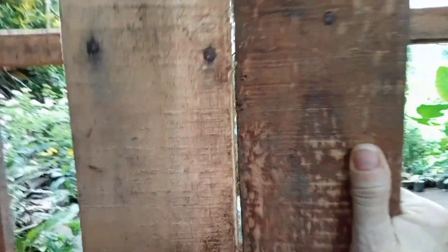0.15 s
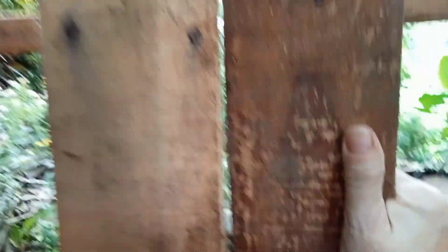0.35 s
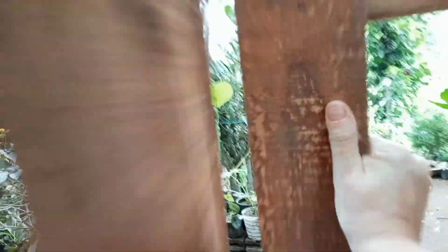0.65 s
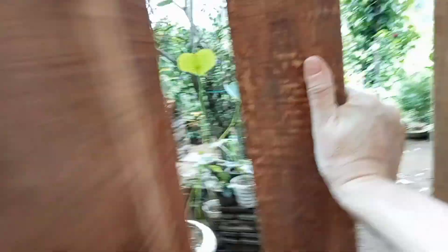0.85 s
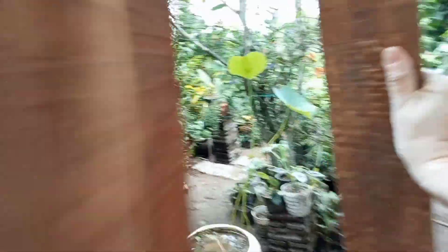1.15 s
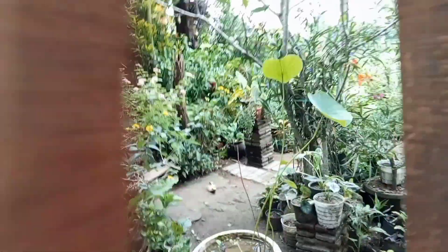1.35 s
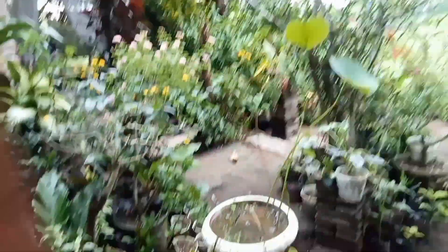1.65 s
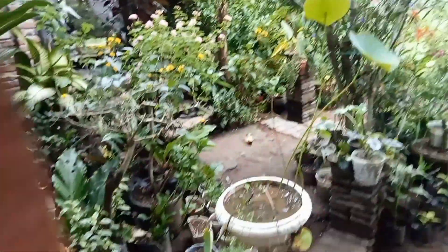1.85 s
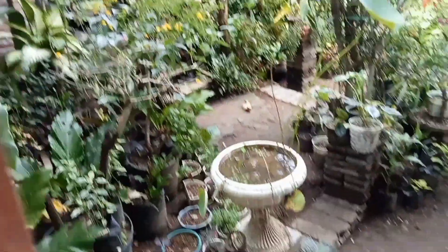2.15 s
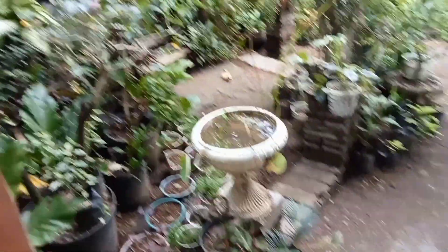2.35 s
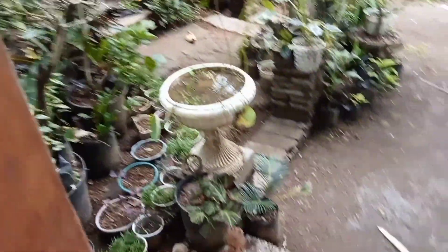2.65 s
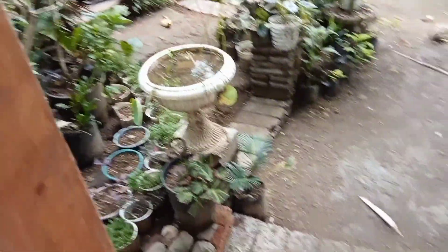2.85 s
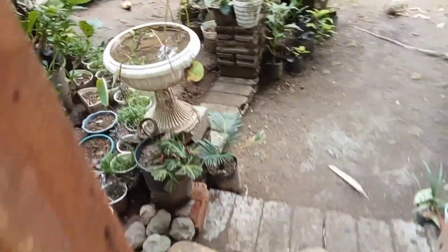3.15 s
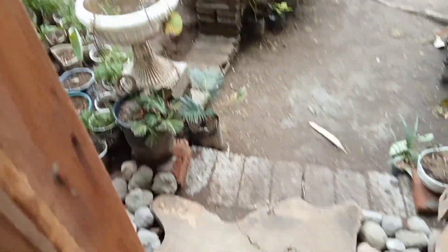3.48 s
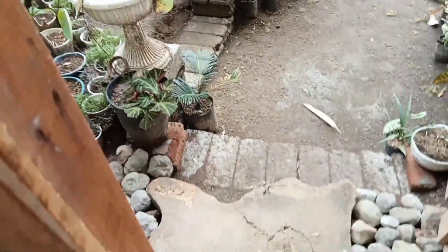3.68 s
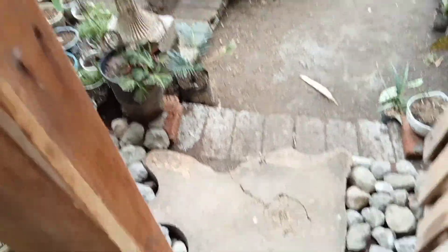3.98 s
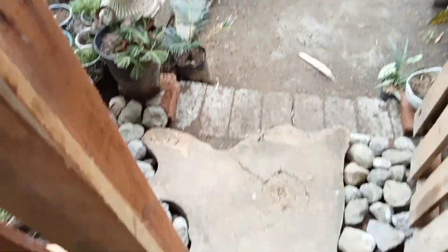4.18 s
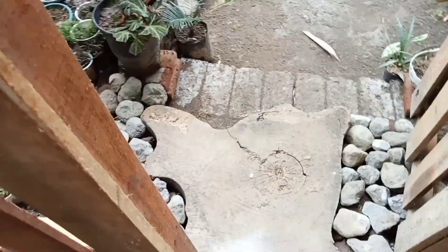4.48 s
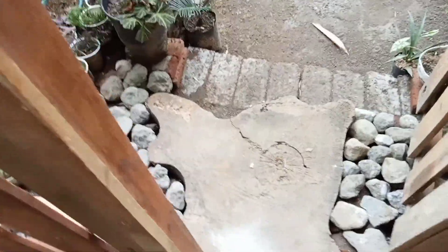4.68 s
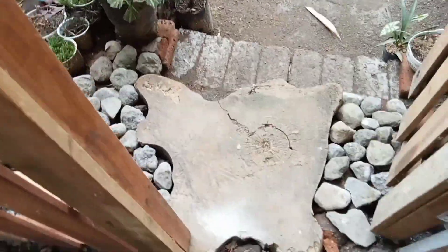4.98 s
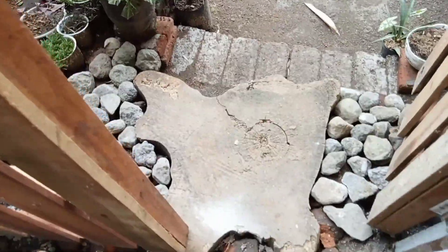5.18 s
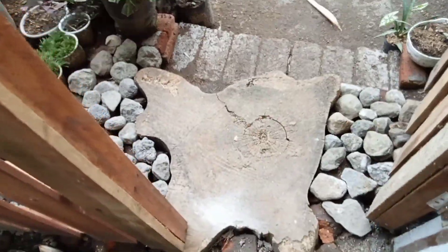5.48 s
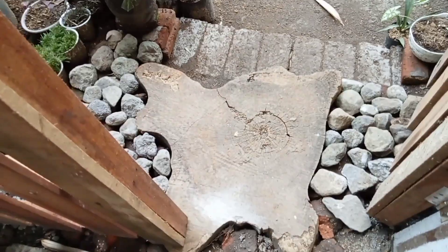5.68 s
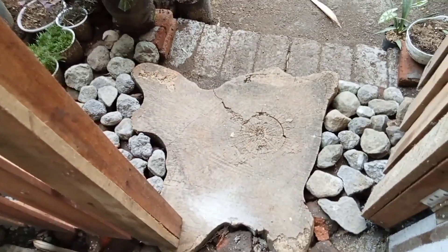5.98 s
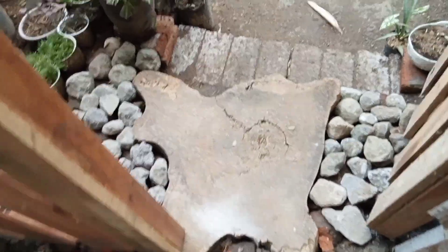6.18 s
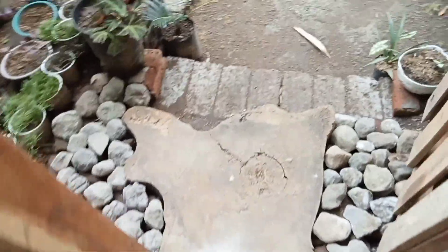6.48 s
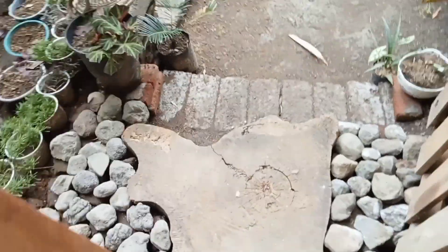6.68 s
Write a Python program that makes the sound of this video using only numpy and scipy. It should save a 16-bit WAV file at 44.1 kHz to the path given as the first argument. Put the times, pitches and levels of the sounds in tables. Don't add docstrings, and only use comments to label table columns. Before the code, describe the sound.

A calm outdoor garden: low airy breeze, thin high insect drone and constant light rubbing of a hand on the recorder. From 0 to 0.6 s there are close ticks, strap snaps and faint wooden touches. Short scrapes begin at about 0.45 s and build to the loudest moment at 0.7 s, a sharp woody clatter and hollow jolt as the gate breaks free. The latch rattles lightly at 1.1 and 1.2 s, with fainter taps until 1.7 s. Tiny bird chirps come from 1.5 to 3.5 s, between cloth strokes and clicks; a faint motor hum enters near 3 s. At 3.8 s a sandal lands firmly, popping and ringing on the wooden slab, then grit crunches. A soft, dull step comes at 5.7 s, birds chirp at 6 s, strap snaps crack at 6.3 s, and the faintest step falls at 6.7 s amid rustling and a rising breeze.

```python
import sys
import numpy as np
from scipy import signal
from scipy.fft import rfft, irfft
from scipy.io import wavfile
from scipy.ndimage import uniform_filter1d

SR = 44100
rng = np.random.default_rng(int(sys.argv[2]) if len(sys.argv) > 2 else 0)


def persist_wave(psi):
    counts = np.round(np.clip(psi, -1, 1) * 32767).astype(np.int16)
    wavfile.write(sys.argv[1], SR, np.atleast_2d(counts).T)


def volts_from_db(level):
    exponent = np.asarray(level, float) / 20
    return 10 ** exponent


N = 301203

# pitch in Hz, level in dB.
AIR_COLOUR = [(22, -43), (35, -25), (60, 3), (130, -2), (250, -5.5), (500, -9.5), (1300, -12.5),
              (2700, -16), (5000, -23.5), (8000, -21.5), (11200, -34), (15500, -37), (16200, -56)]
# time in seconds, strength in dB.
BREEZE = [(0, 0), (.6, 5.5), (1.1, 4.5), (1.6, 1.5), (2.3, 0.5), (3.4, .5), (4.4, -0.5), (4.9, 2),
          (5.6, 0.5), (6.4, 0), (6.83, 6.5)]
# time in seconds, level in dB.
MOTOR_LEVEL = [(2.8, -62), (3.4, -61.5), (4.2, -66), (5, -58.5), (5.6, -62.5), (6.4, -62.5), (6.83, -73)]
# pitch in Hz, level in dB per Hz.
PORT_COLOUR = [(7000, -38), (8200, -23), (8850, 1.5), (9400, 2), (9950, -1), (10500, -19.5), (11500, -30),
               (13000, -43)]
# pitch in Hz, width in Hz, level in dB, how far it follows the swell (ratio).
CHOIRS = [
    (4340, 1900, -67.5, 1.42),
    (7050, 680, -71.5, 0.42),
]
# time in seconds, level in dB.
CHOIR_SWELL = [(0, 0), (.5, 5), (1.84, -2.5), (3.04, 5), (3.78, 2), (4.3, -1), (4.7, -2), (5.44, -12),
               (6.03, -0.5), (6.5, -11), (6.83, -5)]
# start in seconds, length in seconds, first pitch in Hz, last pitch in Hz, level in dB.
BIRDS = [(1.49, .04, 4300, 4000, -67), (1.497, .064, 4700, 2400, -62), (1.615, 0.025, 3400, 3030, -67),
         (2.22, .05, 3350, 2430, -62), (2.48, .1, 3750, 3750, -72), (2.64, .17, 4400, 4150, -70),
         (2.87, .1, 4250, 4300, -69), (2.99, .1, 4450, 4300, -71), (3.32, .07, 4350, 4050, -69),
         (3.46, .1, 4200, 4200, -70), (5.955, .05, 4400, 4250, -67), (6.0, 0.036, 3900, 3380, -60),
         (6.032, 0.022, 3350, 2600, -63), (6.058, 0.031, 3600, 3290, -66), (6.1, .04, 3300, 3600, -69)]

# time in seconds, effort in dB.
GRIP = [(0, -4.5), (1.2, -0.5), (2.6, 0.5), (3.6, 3.5), (4.5, 3.5), (5.3, -7), (6.2, -12), (6.83, -6)]
# pitch in Hz, level in dB per Hz.
RUB_HISS_COLOUR = [(6000, -24), (8200, -1.5), (9400, 8), (10600, -1.5), (13000, -15), (15200, -11),
                   (16000, -17)]
# pitch in Hz, level in dB per Hz.
RUB_BODY_COLOUR = [(300, -2), (900, 12), (2000, 11), (4500, 6), (6500, 3.5), (11000, -26)]
# start in seconds, end in seconds, bright hiss in dB, duller body in dB.
STROKES = [(0.063, 0.142, -68, -65), (.19, 0.368, -62, -63), (0.42, .5, -56, -58), (0.56, .7, -53, -69),
           (0.727, 0.803, -46.5, -53), (.77, .875, -57, -60), (1.02, 1.16, -72, -65.5),
           (1.7, 1.82, -73, -85), (2.04, 2.145, -68, -71), (2.114, 2.28, -59.5, -57),
           (2.274, 2.351, -52, -57.5), (2.37, 2.503, -74, -71), (3.08, 3.177, -57, -63),
           (3.745, 3.903, -59, -57.5), (4.215, 4.356, -68, -71), (4.575, 4.724, -60, -59),
           (4.702, 4.91, -71, -63), (4.873, 5.1, -69, -67.5), (5.134, 5.246, -66, -66),
           (5.98, 6.097, -68, -65), (6.303, 6.367, -64, -64.5), (6.486, 6.538, -53, -51.5),
           (6.535, 6.6, -62, -57), (6.65, 6.716, -54, -58.5), (6.691, 6.82, -58, -62.5)]
# start in seconds, end in seconds, level in dB.
CRACKLES = [(.075, .14, -72), (.6, .7, -62), (.8, .88, -64), (2.05, 2.14, -72), (2.13, 2.29, -66),
            (2.293, 2.347, -58), (3.09, 3.18, -70), (3.79, 3.9, -68), (4.58, 4.72, -66), (6.49, 6.6, -66),
            (6.65, 6.82, -68)]
# pitch in Hz, level in dB per Hz.
CRACKLE_COLOUR = [(6000, -30), (8000, -4), (10500, -2), (12000, 0), (15300, 0), (16000, -15)]
# time in seconds, peak level in dB.
FINGERNAILS = [(.3182, -44), (0.3809, -32.5), (.603, -53), (.6245, -29.5), (1.7888, -62), (2.5397, -53),
               (2.5656, -51), (3.1293, -46), (3.2485, -60), (4.0637, -62), (4.3161, -64), (4.5181, -54),
               (4.7805, -53), (5.1607, -54), (5.1876, -58)]
# time in seconds, peak level in dB.
FINGER_PADS = [(1.049, -62), (1.7205, -63), (2.2245, -57), (2.302, -52), (3.0829, -60), (3.8082, -51),
               (3.85, -54), (4.6163, -56), (5.002, -62), (5.0234, -63), (6.576, -58)]
# time in seconds, peak level in dB, lens part ring in dB.
STRAP_SNAPS = [(.11, -39.5, -1), (.1199, -40, -8), (.2543, -34, -12), (0.568, -42, -17), (.6734, -48, 1),
               (2.374, -37, -16), (2.396, -40, -8), (2.4177, -49, -2), (2.4428, -60, -3), (3.1532, -45, -8),
               (3.167, -50, -4), (3.8674, -56, -9), (3.8881, -53, 1), (3.9035, -53, -6), (4.4792, -51, -10),
               (4.7647, -57, 5), (6.309, -33, -13), (6.3245, -27, -14), (6.3405, -44, -2), (6.35, -48, -9),
               (6.3584, -53, -7), (6.657, -32, -12), (6.686, -39, -18), (6.767, -37, -16),
               (6.7814, -48, -17), (6.7944, -46, -18)]

# time in seconds, level in dB, pitch in Hz.
KNOCKS = [(0.0743, -39.5, 167), (0.108, -43, 181), (0.26, -40.5, 912), (.535, -51, 2400), (.559, -47, 2350),
          (.559, -50, 3000), (.637, -38, 1425), (0.7072, -16.5, 3250), (.712, -19, 1353), (.717, -19, 340),
          (.715, -24.5, 990), (.716, -23.5, 233), (.719, -19, 4560), (.7185, -21.5, 1880), (.739, -23, 245),
          (1.035, -52, 1980)]
# time in seconds, level in dB, pitch in Hz.
UNDERFOOT = [(3.13, -53, 700), (3.7925, -26, 1700), (3.7935, -30, 1860), (3.796, -24, 1100),
             (3.7925, -43, 4300), (3.7925, -33.5, 2900), (4.255, -43, 6100), (4.6, -47, 5400),
             (4.255, -43, 4300), (4.264, -46, 4200), (4.256, -53, 1850), (6.52, -51, 1800),
             (6.565, -43.5, 3150)]
# time in seconds, level in dB, pitch in Hz.
GRIT = [(.0725, -37, 1240), (3.942, -41, 1400), (3.988, -37, 1400), (3.99, -50, 2500), (4.002, -42, 1790),
        (4.63, -50, 4480), (4.665, -43, 4900), (4.721, -46, 4360), (4.744, -44, 4700), (4.8, -51, 5500),
        (4.822, -48, 4360), (4.835, -48, 4940), (4.855, -47, 4520), (4.881, -53, 4470),
        (5.187, -40.5, 1660), (5.188, -46, 6500), (5.753, -49, 2100), (6.547, -46, 2380), (6.73, -45, 2420),
        (6.751, -36, 1640)]
# time in
# seconds, level in dB, pitch in Hz.
SMALL_RINGS = [(.62, -40, 990), (.64, -42, 990), (.66, -44, 980), (.687, -38, 800), (.7125, -17, 1320),
               (.719, -21, 1520), (.727, -28, 850), (.733, -30, 1550), (.745, -34, 1000), (.757, -30, 330),
               (.783, -40, 800), (.803, -36, 290), (.808, -39, 130), (.833, -43, 190), (.843, -47, 980),
               (.94, -52, 620), (.97, -52, 630), (3.794, -28, 1420), (3.812, -30, 800), (6.721, -46, 250),
               (3.8, -40, 90), (5.73, -51, 85), (6.69, -49, 80), (.708, -24, 3120), (.714, -29, 720),
               (6.682, -40, 240)]
# time in seconds, level in
# dB, pitch in Hz.
TINY_GRAINS = [(.625, -28, 9300), (.637, -30, 9400), (.638, -34, 4200), (.642, -36, 2600), (.687, -26, 9300),
               (.6868, -26, 3400), (.6868, -28, 1600), (.691, -34, 7000), (3.7925, -22, 1400), (4.59, -50, 3600),
               (4.645, -48, 5600), (4.69, -48, 4200), (4.77, -50, 6200), (4.79, -50, 3700), (.655, -38, 4300),
               (.657, -40, 2600), (1.68, -54, 3300), (1.69, -52, 3200), (2.2235, -44, 1300), (2.2235, -46, 2900),
               (2.335, -50, 4200), (2.336, -50, 3000), (6.5, -48, 4900), (6.502, -46, 2150), (6.512, -48, 1800),
               (6.52, -46, 4600), (6.527, -46, 4800), (6.533, -46, 1900), (6.54, -48, 1400), (6.552, -47, 5600),
               (6.56, -46, 1750), (6.577, -44, 1750), (6.578, -48, 4500), (6.59, -48, 1800), (6.625, -50, 2000),
               (6.648, -55, 4500), (6.731, -46, 1400), (6.785, -48, 2500), (6.796, -48, 4300), (2.302, -42, 8800),
               (2.302, -46, 11000), (.64, -34, 1450), (.652, -38, 3300), (.664, -40, 1500), (.672, -42, 3800),
               (.695, -34, 2400), (.7, -34, 1500), (6.705, -40, 780), (6.714, -42, 740), (5.743, -38, 820),
               (5.732, -38, 1020), (3.9885, -44, 2000)]
# pitch as a ratio, level in dB.
CLUSTER = [(1, 0), (1.045, -7), (.95, -7), (1.09, -11)]

# time in seconds, level in dB, slab ring in dB, treble tilt in dB per octave,
# heel flap in dB.
STEPS = [
    (3.792, -12, -20.5, 4, -6.5),
    (5.72, -26, -15, -24, -1),
    (6.681, -30.5, -10, -8, 2.5),
]
# pitch in Hz, level in dB, seconds to die by 60 dB.
SLAB_TONES = [(206, 2, 0.2), (299.7, 1, 0.24), (451, -8, 0.33), (550, -5, 0.098), (709, 2, 0.14),
              (803, 1, 0.15), (1002, -2, 0.15), (1240, -1, 0.069)]
# pitch in Hz, level in dB per Hz.
SLAP_COLOUR = [(35, -67), (60, -21.5), (476, -7.5), (783, -3.5), (1700, -11), (2040, -14), (3030, -17),
               (4090, -27.5), (7000, -43), (9100, -76), (15400, -120)]
# pitch in Hz, seconds to die by 60 dB.
YARD_RING = [(100, 0.56), (260, 0.22), (700, .13), (1800, 0.071), (4500, 0.019)]

# start in seconds, level in dB, hold in seconds, fade in seconds,
# treble tilt in dB per octave.
SCRAPES = [(0.453, -44, 0.017, 0.032, 2), (0.471, -37, 0.0022, .011, 3.5), (0.6227, -35.5, .003, 0.011, 5),
           (0.632, -35.5, 0.0065, 0.0098, 1), (0.648, -37, 0.0046, 0.038, 0.5),
           (0.687, -30.5, 0.0017, .036, -1), (0.706, -16, 0.0037, 0.012, 3.5),
           (0.709, -15.5, 0.01, 0.0032, 0), (0.73, -31, 0.0023, 0.029, -1), (0.739, -40, .016, 0.11, -5.5),
           (1.083, -43, 0.0032, 0.0092, -3), (1.22, -49, 0.0032, 0.1, -2.5),
           (1.369, -51.5, 0.003, .006, 1.5), (3.926, -51.5, 0.017, 0.019, -4.5),
           (3.988, -55.5, .006, 0.033, -2.5), (5.187, -56, 0.003, .011, 1), (6.5, -53, 0.043, 0.098, 2)]
# pitch in Hz, level in dB per Hz.
SCRAPE_COLOUR = [(88, -76), (150, -3.5), (348, -2), (790, -3.5), (1390, 3.5), (2310, -4), (3220, -3),
                 (3550, -6.5), (4580, -4.5), (5570, -13.5), (9820, -10), (15100, -38), (16000, -49)]
# pitch in Hz, level in dB, seconds to die by 60 dB.
GATE_TONES = [(91.5, -4, 0.25), (285, -4, 0.21), (495, 0, 0.14), (642, -2, 0.091), (810, 4, 0.12),
              (990, 1.5, 0.15), (242, 0, 0.2), (350, -4, 0.16)]
# time in seconds, level in dB, softness in milliseconds.
SHOVES = [
    (0.09, -46.5, 0.95),
    (0.469, -51.5, 0.51),
    (0.631, -48, 0.3),
    (.712, -31.5, 0.31),
    (.722, -27, 0.62),
    (.738, -21.5, 2.3),
]
# pitch in Hz, level in dB, seconds to die by 60 dB.
LATCH_TONES = [(879, -1, 0.1), (993, 1, 0.068), (1570, -9, 0.055), (2440, -5, 0.048)]
# time in seconds, peak level in dB.
RATTLES = [
    (1.087, -38.5),
    (1.118, -46),
    (1.224, -39.5),
    (1.254, -38),
    (1.461, -52.5),
    (1.659, -53),
]

THIN_MOMENTS = [.273, .893, 1.191, 1.959, 2.193, 3.111, 3.196, 3.751, 3.921, 4.177, 4.241, 4.732, 5.457,
                5.777, 6.225, 6.332, 6.374, 6.417, 6.567, 6.716, 6.813]


def evened(x):
    return x / np.sqrt(np.mean(abs(x) ** 2) + 1e-20)


def read(points, hz):
    f, value = np.transpose(points)
    return np.interp(np.log(hz + 1), np.log(f + 1), value)


def level_at(rows, t):
    s, db = np.transpose(rows)
    return np.interp(t, s, db)


def add(mix, s, sound):
    part = mix[round(s * SR):][:len(sound)]
    part += sound[:len(part)]


def coloured(x, points, tilt_db=0):
    hz = np.fft.rfftfreq(len(x), 1 / SR)
    colour_db = read(points, hz) + tilt_db * np.log2(hz / 2000 + 0.016)
    return evened(irfft(rfft(x) * volts_from_db(colour_db), len(x)))


def ringing(tones, soft_ms, detune):
    longest = max(t60 for _, _, t60 in tones)
    t = np.arange(0, min(longest * 1.3, 1 / 3), 1 / SR)
    ring = np.zeros(len(t))
    for k, ((hz, db, t60), shift) in enumerate(zip(tones, detune)):
        sign = (-1) ** k
        ring += sign * volts_from_db(db - 60 * t / t60) * np.sin(2 * np.pi * hz * shift * t)
    blow = np.hanning(int(soft_ms * SR / 500) + 3)
    return np.convolve(ring, blow / blow.sum())


def gritty(size, spread_db, grain):
    jumps = uniform_filter1d(rng.standard_normal(size), max(int(grain), 1))
    return rng.standard_normal(size) * volts_from_db(spread_db * evened(jumps))


def air():
    rumble_follows, leaves_follow = 1, 0.66
    frames, hz = N // 256 + 5, np.fft.rfftfreq(1024, 1 / SR)
    a, b, patches = rng.standard_normal((frames, 513, 3)).T
    patches = evened(uniform_filter1d(uniform_filter1d(patches, 16, 0), 12, 1))
    flicker = evened(uniform_filter1d(rng.standard_normal(frames), 4))
    breeze_db = level_at(BREEZE, np.arange(frames) * 256 / SR)
    low = 1 / (1 + (hz[:, None] / 500) ** 2)
    colour_db = read(AIR_COLOUR, hz)[:, None]
    calm = (a + 1j * b) * volts_from_db(colour_db + (2.5 - 1.3 * low) * patches + 0.92 * flicker)
    swell = volts_from_db((low * rumble_follows + (1 - low) * leaves_follow) * breeze_db)
    calm_sound = signal.istft(calm, nperseg=1024, noverlap=768)[1]
    breezy_sound = signal.istft(calm * swell, nperseg=1024, noverlap=768)[1]
    return volts_from_db(-57.5) / np.sqrt(np.mean(calm_sound ** 2)) * breezy_sound[:N]


def motor():
    t, out = np.arange(N) / SR, np.zeros(N)
    width_hz = 7
    r = np.exp(-np.pi * width_hz / SR)
    for hz, db in [(138, 0.3), (201, -1.5)]:
        chance = rng.standard_normal(N) + 1j * rng.standard_normal(N)
        wander = signal.lfilter([1 - r], [1, -r], chance)
        tone = evened(0.55 + evened(wander)) * np.exp(2j * np.pi * hz * t)
        out += volts_from_db(db + level_at(MOTOR_LEVEL, t)) * tone.real
    return out * np.clip(t - MOTOR_LEVEL[0][0], 0, .5) * 2


def insects():
    out = volts_from_db(-58) * coloured(gritty(N, 1.0, 130), PORT_COLOUR)
    swell_db = level_at(CHOIR_SWELL, np.arange(N) / SR)
    for hz, width, db, follows in CHOIRS:
        below = [(hz - 2 * width, -40), (hz - width / 2, -3)]
        above = [(hz + width / 2, -3), (hz + 2 * width, -40)]
        band = below + [(hz, 0)] + above
        out += volts_from_db(db + follows * swell_db) * coloured(gritty(N, 1.0, 200), band)
    return out


def birds():
    out = np.zeros(N)
    for s, length, from_hz, to_hz, db in BIRDS:
        hz = np.linspace(from_hz, to_hz, int(length * SR))
        hz *= 1 + 0.018 * evened(uniform_filter1d(rng.standard_normal(len(hz)), 80))
        flutter_db = 2.2 * evened(uniform_filter1d(rng.standard_normal(len(hz)), 200))
        whistle = np.sin(2 * np.pi * np.cumsum(hz) / SR) * signal.windows.tukey(len(hz), .4)
        add(out, s, volts_from_db(db + flutter_db) * whistle)
    t = np.arange(SR // 8) / SR
    leaves = rng.standard_normal(len(t)) * volts_from_db(-60 * t / .2)
    return out + volts_from_db(2.5) * signal.oaconvolve(out, leaves / np.linalg.norm(leaves))[:N]


def rubbing():
    t = np.arange(N) / SR
    grip_db = level_at(GRIP, t)
    hiss = volts_from_db(-68 + grip_db)
    body = volts_from_db(-69.5 + 1.2 * grip_db)
    for s, end, hiss_db, body_db in STROKES:
        stroke = np.clip((t - s) / 0.041, 0, 1) * np.clip((end - t) / .012, 0, 1)
        hiss = hiss + volts_from_db(hiss_db) * stroke
        body = body + volts_from_db(body_db) * stroke
    hiss_sound = hiss * coloured(gritty(N, 2.3, 90), RUB_HISS_COLOUR)
    return hiss_sound + body * coloured(gritty(N, 2.5, 200), RUB_BODY_COLOUR)


def crackle():
    t, level = np.arange(N) / SR, np.zeros(N)
    for s, end, db in CRACKLES:
        level += volts_from_db(db) * np.clip((t - s) / .015, 0, 1) * np.clip((end - t) / .015, 0, 1)
    return level * coloured(gritty(N, 3.5, 40), CRACKLE_COLOUR)


def ticks():
    out, t = np.zeros(N), np.arange(3000) / SR
    lens_hz, lens_t60, snap_t60 = 14900, 0.08, .007
    # time in seconds, peak in dB, dull part in dB, lens ring in dB
    rows = [(s, db, 0.5, -25) for s, db in FINGERNAILS]
    rows += [(s, db, 15, -25) for s, db in FINGER_PADS]
    rows += [(s, db, -49 - db, lens_db) for s, db, lens_db in STRAP_SNAPS]
    chance = rng.standard_normal((len(rows), 3, 3000))
    bright_band = signal.butter(2, [8800, 15500], "band", fs=SR, output="sos")
    dull_band = signal.butter(2, [2500, 8500], "band", fs=SR, output="sos")
    lens_band = signal.butter(1, [lens_hz - 150, lens_hz + 150], "band", fs=SR, output="sos")
    snap = volts_from_db(-60 * t / snap_t60)
    for (s, db, dull_db, lens_db), (a, b, c) in zip(rows, chance):
        bright = signal.sosfilt(bright_band, a * snap)
        dull = signal.sosfilt(dull_band, b * snap)
        lens = volts_from_db(lens_db - 60 * t / lens_t60) * evened(signal.sosfilt(lens_band, c)) * 0.55
        sound = bright / abs(bright).max() + volts_from_db(dull_db - 6.0) * dull / abs(dull).max()
        add(out, s, volts_from_db(db) * (volts_from_db(5.5) * sound + lens))
    return out


def clicks(ringers, grains):
    out = np.zeros(N)
    rows = [(s, db, hz, 0.066 * (hz / 1000) ** -0.45) for s, db, hz in ringers]
    rows += [(s, db, hz, 0.012) for s, db, hz in grains]
    for s, db, hz, t60 in rows:
        tones = [(hz * ratio, tone_db, t60) for ratio, tone_db in CLUSTER]
        add(out, s, volts_from_db(db) * ringing(tones, .05, rng.uniform(.985, 1.015, len(tones))))
    return out


def yard(tilt_db):
    hz, t, z = signal.stft(rng.standard_normal(SR // 2), SR, nperseg=128)
    dull_db = tilt_db * np.log2(np.maximum(hz / 950, 1))
    fade_db = 60 * t / read(YARD_RING, hz)[:, None]
    tail = signal.istft(z * volts_from_db(dull_db[:, None] - fade_db), SR, nperseg=128)[1]
    shaped = coloured(np.append(np.zeros(200), tail), SLAP_COLOUR)[200:]
    return shaped / abs(shaped).max() * np.clip(np.arange(len(shaped)) / 220, 0, 1) ** 2


def sandals():
    out = np.zeros(N)
    pocket_hz, cycles = 747, 3.2
    u = np.arange(int(cycles * SR / pocket_hz)) * pocket_hz / SR
    pop = np.sin(2 * np.pi * u) * (.45 + .18 * u) * np.clip(4 * (cycles - u), 0, 1)
    t = np.arange(SR // 140) / SR
    thud = np.sin(2 * np.pi * 290 * t) * np.hanning(len(t))
    flap = np.sin(2 * np.pi * 340 * t) * np.hanning(len(t))
    for s, db, slab_db, tilt_db, flap_db in STEPS:
        add(out, s, volts_from_db(db) * pop)
        add(out, s, volts_from_db(db - 9 + flap_db) * thud)
        add(out, s + .0093, volts_from_db(db + flap_db) * flap)
        add(out, s, volts_from_db(db - 3.0) * yard(tilt_db))
        slab = ringing(SLAB_TONES, 0.23, rng.uniform(0.96, 1.01, len(SLAB_TONES)))
        add(out, s + 0.00221, volts_from_db(db + slab_db) * slab)
    return out


def gate():
    out = np.zeros(N)
    t = np.arange(8192) / SR
    for s, db, hold, fall, tilt_db in SCRAPES:
        rise = 0.73 * hold
        fade = np.exp(-2 * np.maximum(t - rise - hold, 0) / fall)
        shape = np.clip(t / rise, 0, 1) ** 2 * fade
        add(out, s, volts_from_db(db) * shape * coloured(gritty(8192, 1.63, 48), SCRAPE_COLOUR, tilt_db))
    for s, db, soft_ms in SHOVES:
        boards = ringing(GATE_TONES, soft_ms, rng.uniform(0.985, 1.015, len(GATE_TONES)))
        add(out, s, volts_from_db(db) * boards)
    for s, db in RATTLES:
        latch = ringing(LATCH_TONES, 0.23, rng.uniform(1.0, 1.01, len(LATCH_TONES)))
        add(out, s, volts_from_db(db + 2.0) * latch)
    return out


def scene():
    background = air() + motor() + insects() + birds()
    handling = rubbing() + crackle() + ticks()
    small_parts = clicks(KNOCKS + UNDERFOOT, GRIT) + clicks(SMALL_RINGS, TINY_GRAINS)
    return (background + handling + small_parts + sandals() + gate())[None]


def thinned(x):
    size = 1500
    out, hz = x.copy(), np.fft.rfftfreq(2048, 1 / SR)
    window = np.sin(np.pi * np.arange(size) / size)
    for s in THIN_MOMENTS:
        at = slice(round(s * SR) - size // 2, round(s * SR) + size // 2)
        z = rfft(x[at] * window, 2048)
        spared = np.exp(-((hz - 9400) / 600) ** 2) + (hz < 1200) + .15 * (hz > 10500)
        threshold = np.sqrt(uniform_filter1d(abs(z) ** 2, 60)) * volts_from_db(5 - 12 * spared)
        change = np.where(abs(z) < threshold, -.85, .9 * np.clip(1 - spared, 0, 1))
        out[at] += irfft(z * change, 2048)[:size] * window
    return out


def band_limit(x):
    return signal.sosfilt(signal.butter(12, 16530, fs=SR, output="sos"), x)


def record(dry):
    thin = signal.sosfilt(signal.butter(3, 50, "high", fs=SR, output="sos"), dry[0])
    top_cut = signal.firwin(255, 15600, window=("kaiser", 3.0), fs=SR)
    cut = signal.oaconvolve(thin, top_cut, "same")
    finished = thinned(cut)[None]
    return band_limit(finished)


dry = scene()
out = record(dry)
persist_wave(out)
```